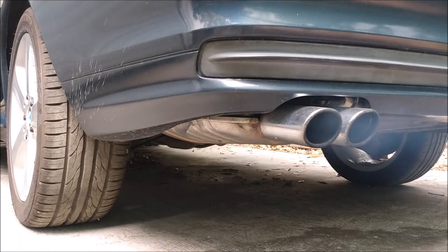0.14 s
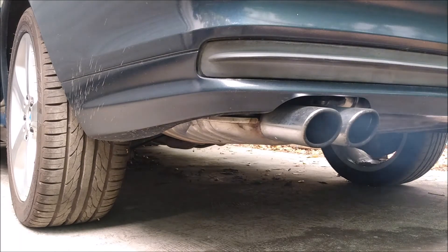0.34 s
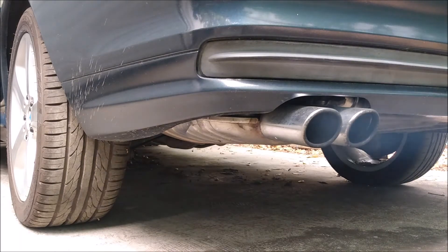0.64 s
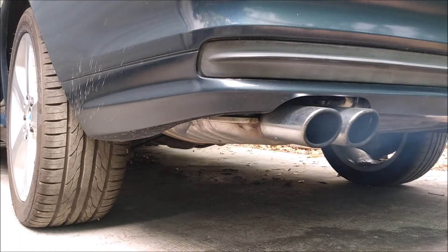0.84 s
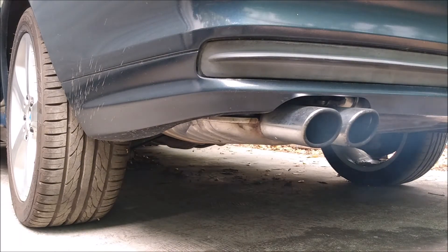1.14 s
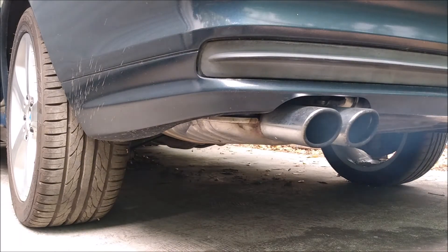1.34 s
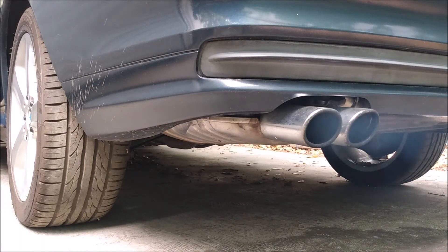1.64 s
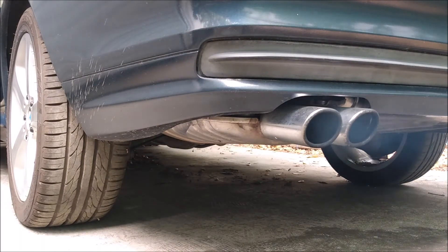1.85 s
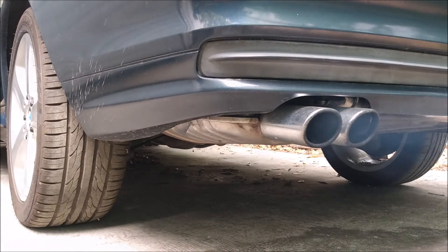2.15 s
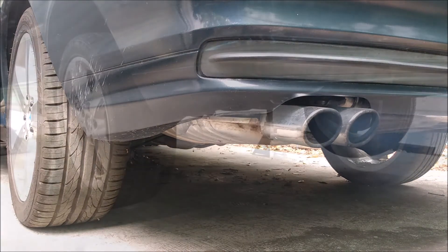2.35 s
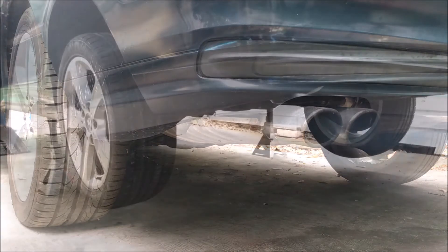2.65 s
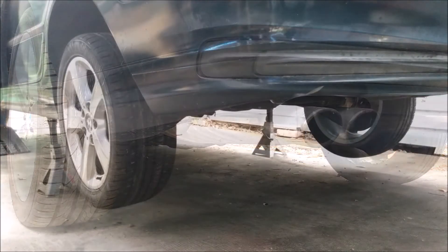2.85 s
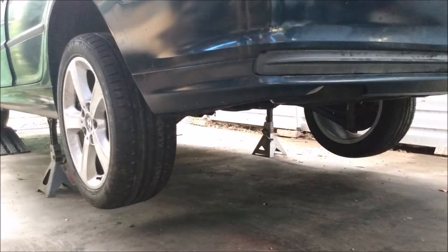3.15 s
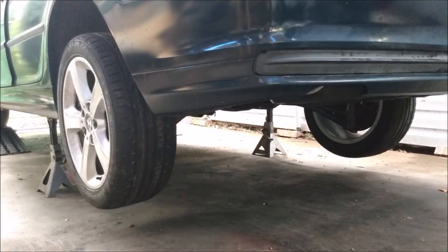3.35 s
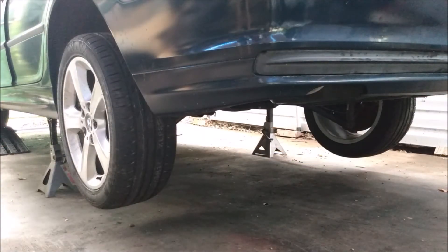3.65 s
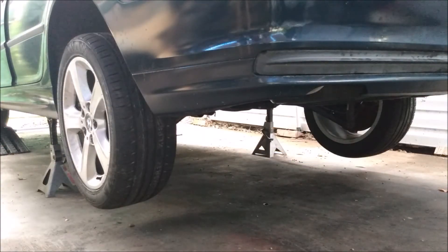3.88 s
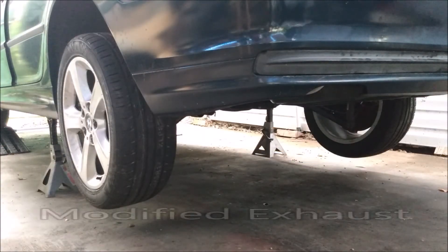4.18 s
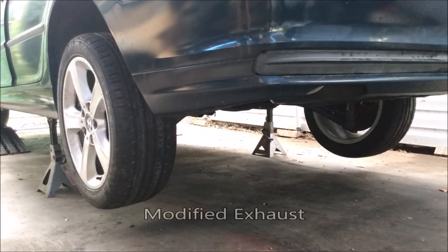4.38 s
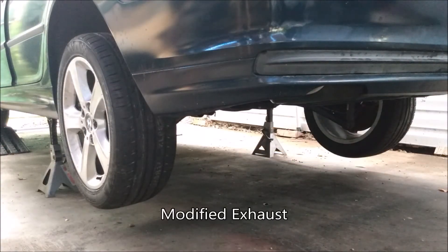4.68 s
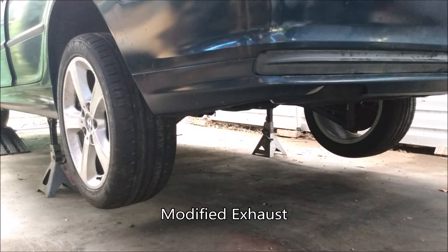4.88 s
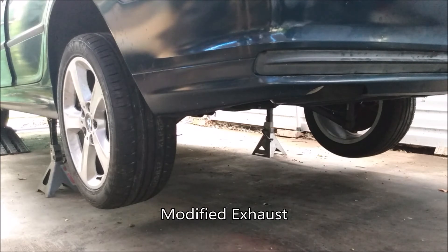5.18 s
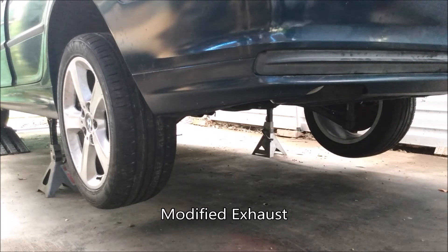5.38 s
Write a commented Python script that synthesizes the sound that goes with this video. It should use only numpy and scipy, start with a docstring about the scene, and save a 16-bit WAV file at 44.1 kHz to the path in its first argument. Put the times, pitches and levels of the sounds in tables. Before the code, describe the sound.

A six-cylinder car idles fast and evenly, a deep hum with rushing exhaust gas and a thin belt whine. It gradually fades out as a slower, loping, boomy idle with a high hiss fades in. Just past halfway, one sharp metallic snap echoes briefly under the car, and a few faint ticks follow. The microphones are low over a concrete floor, close to the tailpipes.

```python
"""On a concrete floor, microphones low down and close to the tailpipes of an idling six-cylinder car.
A fast, even idle fades out while a slow, loping one with a modified exhaust and a high hiss fades in.
Each is a stack of engine orders, with puffs ringing the pipe, rushing gas and shaken metal.
One sharp metallic snap echoes under the car, and a few faint ticks follow."""
import sys
import numpy as np
from scipy import signal
from scipy.fft import rfft, irfft, next_fast_len
from scipy.io import wavfile
from scipy.ndimage import map_coordinates

SR = 44100
rng = np.random.default_rng(int(sys.argv[2]) if len(sys.argv) > 2 else 0)


def wav_record(signal):
    """Record a signal, one row per channel, as 16-bit PCM in the file named by sys.argv[1]."""
    frames = np.transpose(np.atleast_2d(signal))
    bounded = np.clip(frames, -1, 1)
    # unit amplitude maps onto the largest positive 16-bit level
    quanta = np.round(bounded * 32767).astype(np.int16)
    wavfile.write(sys.argv[1], SR, quanta)


N = 243429
TIME = np.arange(N) / SR

# machinery rumble under both idles: (frequency [Hz], level [dB])
RUMBLE = [(8, -6), (30, -25), (60, 6), (110, -19), (250, -9), (500, -63)]


def fast_idle(start_rpm=1034.6, settled_rpm=1017, ease_s=.65, lag_s=.4):
    """A deep hum at the firing rate that hardens as the idle valve eases and the crank slows a little."""
    # exhaust tones: (order [per engine cycle], level [dB])
    orders = [(6, 0.5), (7, -28), (9, -18.5), (10, -61), (11, -33), (12, -4.5), (15, -28.5), (18, -23),
              (19, -38.5), (21, -33), (24, -19.5), (27, -37.5), (30, -36.5), (33, -40), (42, -37),
              (43, -37.5), (45, -44), (48, -35), (81, -44.5)]
    # rounder colour of the hum before easing: (frequency [Hz], gain [dB])
    rounder = [(52, 1.8), (104, -2), (208, -3.5), (420, -1)]
    # pipe resonances and engine metal rings: (frequency [Hz], width [Hz], level [dB])
    pipe = [(90, 40, -5.5), (209, 35, -8), (300, 43, -13), (373, 37, -10.5), (623, 18, -10.5),
            (785, 17, -13), (1236, 27, -24)]
    metal = [(1235, 10, 8), (1499, 20, 0), (6860, 120, -12), (9200, 23, -18.5)]
    # gas rush: (frequency [Hz], level [dB])
    gas_colour = [(260, -49), (450, -13), (571, -13.5), (624, -4), (662, -12.5), (989, -12), (1160, -17),
                  (1250, -22.5), (1350, -15.5), (1960, -16), (4000, -26), (7810, -33), (10700, -23),
                  (13900, -26), (15700, -30.5)]
    rpm = settled_rpm + (start_rpm - settled_rpm) * np.exp(-np.maximum(TIME - ease_s, 0) / lag_s)
    cycles = engine_cycles(rpm, zero_s=.108)
    eased = ramp(ease_s, ease_s + .21)
    hum = drone(cycles, orders, centre=10.39, spread=.008, unrest=.075, drift=.13)
    hum = eased * hum + (1 - eased) * filtered(hum, lambda hz: amp(along(rounder, hz)))
    pipe_tone = amp(-30 - 9 * eased) * np.sqrt(2) * np.sin(2 * np.pi * 36 * cycles)
    puffs = amp(-30) * burble(cycles, pipe, swirl=.047, flow=.014)
    gas = amp(-28.5 + .24 * wobble(10.2)) * rush(gas_colour) * throb(cycles, depth=.1, count=6)
    whine = belt_whine(cycles, start_rpm) * amp(-2 * eased)
    machinery = whine + amp(-42.5) * ringing(metal) + amp(-23) * rush(RUMBLE)
    car = hum + pipe_tone + puffs + underbody(gas, echo_db=-24) + machinery
    return arriving(car, left_late_ms=-.096)


def slow_idle(mean_rpm=709.7, hunt_rpm=4.48, hunt_period_s=1.278):
    """A boom at twice the firing rate lopes once a cycle while the crank hunts around its set speed."""
    # exhaust tones: (order [per engine cycle], level [dB])
    orders = [(6, -35), (11, -44), (12, 0), (13, -26), (14, -24.5), (15, -17.5), (17, -47), (18, -11),
              (20, -44), (21, -16), (22, -27.5), (23, -21.5), (24, -11.5), (26, -30), (27, -25), (30, -24),
              (32, -34.5), (33, -25), (34, -31), (36, -36.5), (39, -49), (42, -41), (54, -39), (57, -41.5),
              (81, -46.5), (90, -40.5), (99, -40)]
    # pipe resonances, hollow silencer note, engine metal rings: (frequency [Hz], width [Hz], level [dB])
    pipe = [(129, 44, 1), (243, 107, -7), (327, 50, -4.5), (393, 66, -13.5), (487, 33, -12), (536, 17, -9),
            (593, 25, -11), (690, 23.3, -18)]
    silencer = [(331, 21, 0)]
    metal = [(972, 71, -3), (1170, 44, -2), (2350, 48, -10), (4700, 220, -12), (6820, 170, -14.5)]
    # gas rush: (frequency [Hz], level [dB])
    gas_colour = [(240, -27), (400, -14), (523, -6.5), (595, -10), (634, -14.5), (693, -11), (862, -10.5),
                  (1250, -11), (2080, -17.5), (2400, -17), (2590, -17), (8500, -28.5), (11000, -40),
                  (18700, -120)]
    rpm = mean_rpm + hunt_rpm * np.cos(2 * np.pi * (TIME - 3.87) / hunt_period_s)
    cycles = engine_cycles(rpm, zero_s=4.395)
    boom = drone(cycles, orders, centre=23, spread=.017, unrest=.26, drift=.47)
    puffs = amp(-26) * burble(cycles, pipe, swirl=.038, flow=.012)
    chug = amp(-34.5) * unit(ringing(silencer).mean(0)) * throb(cycles - .34, depth=.71, count=1)
    gas = amp(-27.5 + .42 * wobble(14)) * rush(gas_colour) * throb(cycles, depth=.052, count=6)
    gas += hiss(cycles)
    machinery = amp(-38.5 + 2.8 * wobble(30)) * ringing(metal) + amp(-25.5) * rush(RUMBLE)
    car = boom + puffs + chug + underbody(gas, echo_db=-21.5) + machinery
    return arriving(car, left_late_ms=.13)


def drone(cycles, orders, centre, spread, unrest, drift):
    """Engine orders leave the pipe; higher ones come later in the cycle, weaker ones are less steady."""
    out = np.zeros(N)
    burn = wobble(6)
    for order, db in orders:
        delay = spread * (order - centre) ** 2 / 2
        weakness = 1 - amp(db / 2)
        size = amp(db) * (1 + unrest * weakness * (.54 * burn + .76 * wobble(9)))
        out -= size * np.cos(2 * np.pi * (order * cycles - delay) + drift * weakness * wobble(9))
    return np.sqrt(2) * out


def burble(cycles, pipe, swirl, flow, cylinders=6, swirl_s=.0061):
    """No two burns are alike: each puff's excess, and the swirling gas behind it, rings the pipe."""
    firings = np.flatnonzero(np.diff(np.floor(cycles * cylinders)))
    excess = np.bincount(firings, rng.uniform(-1.13, 1, len(firings)), N)
    wakes = signal.lfilter([1], [1, -np.exp(-1 / (swirl_s * SR))], np.bincount(firings, minlength=N))
    drive = excess + (flow + swirl * wakes) * rng.standard_normal((2, N))
    left, right = filtered(drive, lambda hz: resonances(pipe, hz) / (1 + (hz / 1800) ** 4))
    # long waves reach both microphones alike
    side = filtered((left - right) / 2, lambda hz: hz ** 2 / (hz ** 2 + 400 ** 2))
    return unit((left + right) / 2 + np.array([side, -side]))


def snap(metal_t60_s=.076):
    """A hard metal crack with a brief ring, scattered between floor and underbody."""
    # metal contact: (time [s], level [dB])
    contacts = [(3.2883, -29.5)]
    # echo spectrum: (frequency [Hz], level [dB])
    colour = [(300, -4), (600, -2), (1400, -8.5), (1900, -10.5), (2700, -2.5), (4300, 0), (5400, -7),
              (6800, -2), (8500, -15), (10900, 1.5), (12800, -9), (15700, -13)]
    # echo decay: (frequency [Hz], time to fall 60 dB [s])
    decay = [(600, 0.37), (3000, 0.26), (7000, 0.23), (11000, 0.2), (15000, .13)]
    # rings of the struck part: (frequency [Hz], width [Hz], level [dB])
    modes = [(4250, 1100, -1), (11200, 700, -4)]
    out = np.zeros((2, N))
    for start, db in contacts:
        age = TIME - start
        hz, frames, spectra = signal.stft(rush(colour), SR, nperseg=256)
        spectra *= amp(-60 * np.maximum(frames - start, 0) / along(decay, hz)[:, None])
        crack = 1 + .49 * np.exp(-np.abs(age) / .0065)
        echoes = signal.istft(spectra, SR, nperseg=256)[1][:, :N] * crack
        metal = ringing(modes) * amp(-7 - 60 * np.abs(age) / metal_t60_s)
        out += amp(db) * (age > 0) * (amp(-4.5) * echoes + metal)
    return out


def hiss(cycles):
    """A high hiss that grows a little near the end and starts to swell with the lope."""
    # hiss spectrum: (frequency [Hz], level [dB])
    colour = [(5000, -66), (8500, -12.5), (10700, 1), (15000, -10.5), (15700, -7)]
    building = ramp(4.5, 5)
    level = amp(-28.9 + 1.1 * building + .88 * wobble(28))
    return level * rush(colour) * throb(cycles - .67, depth=.21 * building, count=1)


def belt_whine(cycles, start_rpm):
    """Thin, fluttering whines of the belt drive follow the crank speed."""
    # belt tones: (frequency at the starting speed [Hz], level [dB])
    whines = [(625, -31), (1250, -46.5), (1715, -49), (2100, -47.5), (2550, -55), (2980, -57)]
    shaft_s = cycles * 120 / start_rpm
    out = np.zeros(N)
    for hz, db in whines:
        out += amp(db + 2 * wobble(15)) * np.sin(2 * np.pi * hz * shaft_s + hz / 1600 * wobble(14))
    return out * throb(cycles, depth=.26, count=1)


def ticks(hz=4750, width_hz=380, t60_s=.054):
    """Light taps on a small metal part with one short ring."""
    # metal contacts: (time [s], level [dB])
    taps = [(3.5668, -56.5), (4.747, -50), (5.3097, -51)]
    strokes = sum(amp(db - 60 * np.abs(TIME - start) / t60_s) * (TIME > start) for start, db in taps)
    return strokes * ringing([(hz, width_hz, 0)])


def ringing(modes):
    """Parts shaken all the time: stereo noise in narrow peaks, rms 1."""
    peaks = lambda hz: sum(amp(db) / (1 + ((hz - f) / (.46 * width)) ** 2) for f, width, db in modes)
    return unit(filtered(rng.standard_normal((2, N)), peaks))


def rush(spectrum):
    """Stereo noise of rms 1: alike in the bass, unrelated in the treble."""
    # likeness at the two microphones: (frequency [Hz], correlation [0-1])
    alike = [(100, 0.72), (300, 1), (600, 0.85), (1200, 0.39), (4000, 0.12), (12000, 0.033)]

    def mid_and_side(hz):
        turn = np.arccos(np.clip(along(alike, hz), -1, 1)) / 2
        return amp(along(spectrum, hz)) * [np.cos(turn), np.sin(turn)]

    mid, side = filtered(rng.standard_normal((2, N)), mid_and_side)
    return unit(np.array([mid + side, mid - side]))


def underbody(x, echo_db, spread_s=.009, count=10):
    """Weak early echoes between floor and car ripple the spectrum."""
    paths = np.zeros(SR // 20)
    paths[0] = 1
    lateness, polarity = rng.random((count, 2)).T
    delays = ((.001 + spread_s * lateness) * SR).astype(int)
    paths[delays] = amp(echo_db) * np.sign(polarity - .5)
    return signal.fftconvolve(x, paths[None] / np.linalg.norm(paths), axes=1)[:, :N]


def arriving(x, left_late_ms):
    """Sound from one side reaches one microphone later."""
    return filtered(x, lambda hz: np.exp(-1j * np.pi * np.outer([1, -1], hz) * left_late_ms / 1000))


def engine_cycles(rpm, zero_s):
    """Running count of four-stroke cycles, two crank turns each."""
    cycles = np.cumsum(rpm) / (120 * SR)
    return cycles - np.interp(zero_s, TIME, cycles)


def throb(cycles, depth, count):
    """A gain that swells count times per engine cycle."""
    return 1 + depth * np.cos(2 * np.pi * count * cycles)


def resonances(modes, hz):
    """Complex response of pipe modes, alternating in sign."""
    return sum((-1) ** k * amp(db) * 1j * hz * width / (f * f - hz * hz + 1j * hz * width)
               for k, (f, width, db) in enumerate(modes))


def filtered(x, response):
    """x times a complex response of frequency."""
    size = next_fast_len(N + SR // 2)
    return irfft(rfft(x, size) * response(np.fft.rfftfreq(size, 1 / SR)), size)[..., :N]


def wobble(rate):
    """A smooth random curve, rate knots a second."""
    knots = rng.standard_normal(int(N * rate / SR) + 4)
    return map_coordinates(knots, [TIME[::64] * rate]).repeat(64)[:N]


def ramp(start_s, end_s):
    """Rises evenly from 0 to 1 between two times."""
    return np.clip((TIME - start_s) / (end_s - start_s), 0, 1)


def along(points, hz):
    """(Hz, value) points read on a log axis."""
    freqs, values = np.transpose(points)
    return np.interp(np.log(hz + 1), np.log(freqs + 1), values)


def amp(db):
    """Decibels to gain."""
    return 10 ** (np.asarray(db) / 20)


def unit(x):
    """Scale to rms 1."""
    return x / np.sqrt(np.mean(x ** 2) + 1e-20)


def scene():
    """At the tailpipes: one idle fades into the other, with snap and ticks, leaning slightly right."""
    # microphone balance: (frequency [Hz], left minus right [dB])
    balance = [(60, -1.3), (110, -0.8), (200, 1), (400, -.5), (2500, -1), (5000, 0.5), (9000, -3),
               (11000, -3.5), (14000, 4)]
    fast = amp(-19) * (1 - ramp(.72, 3.123)) * fast_idle()
    slow = amp(-19.5) * ramp(2.19, 4.69) * slow_idle()
    mix = fast + slow + snap() + ticks()
    return filtered(mix, lambda hz: amp(np.outer([1, -1], along(balance, hz)) / 2))


def record(dry):
    """The camera keeps nothing above its band limit."""
    return filtered(dry, lambda hz: hz < 15780)


dry = scene()
out = record(dry)
wav_record(out)
```